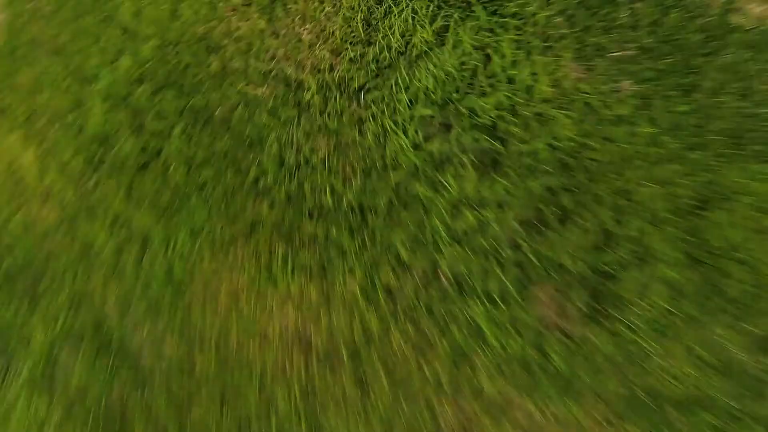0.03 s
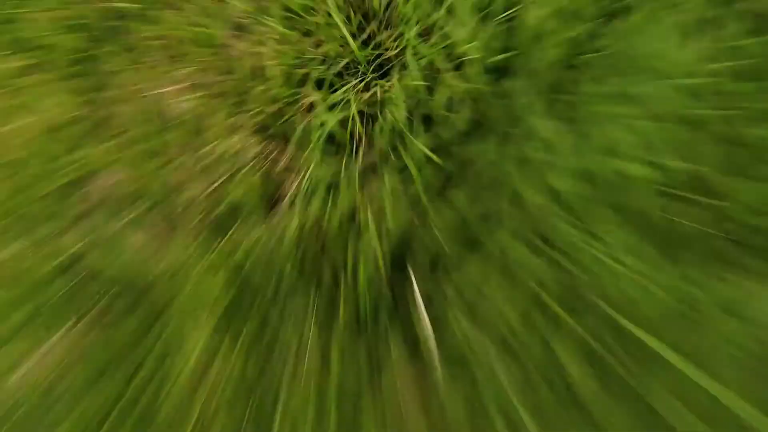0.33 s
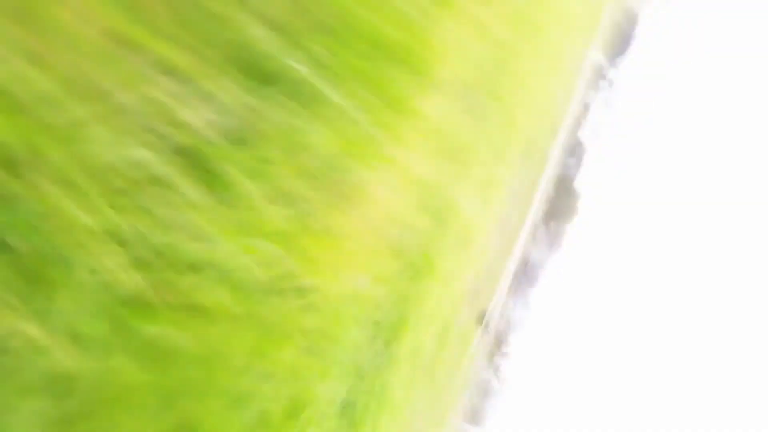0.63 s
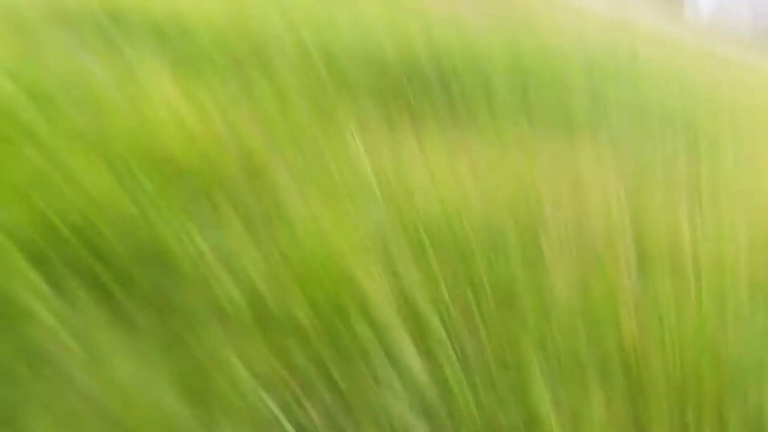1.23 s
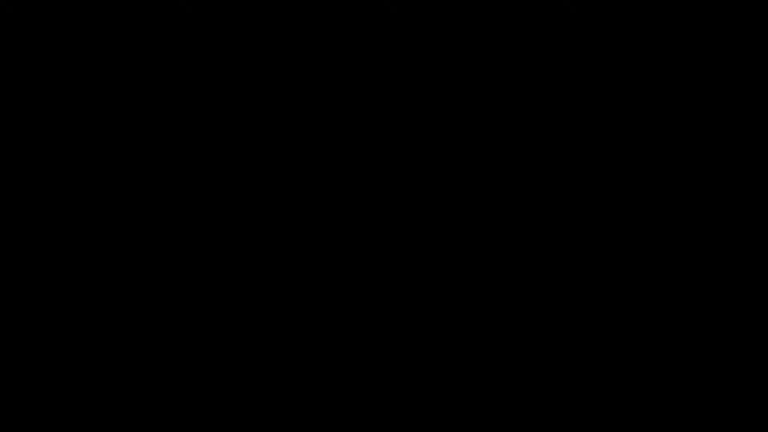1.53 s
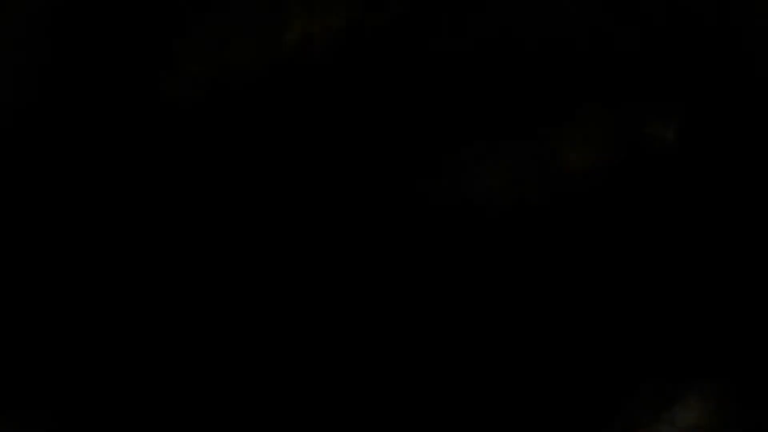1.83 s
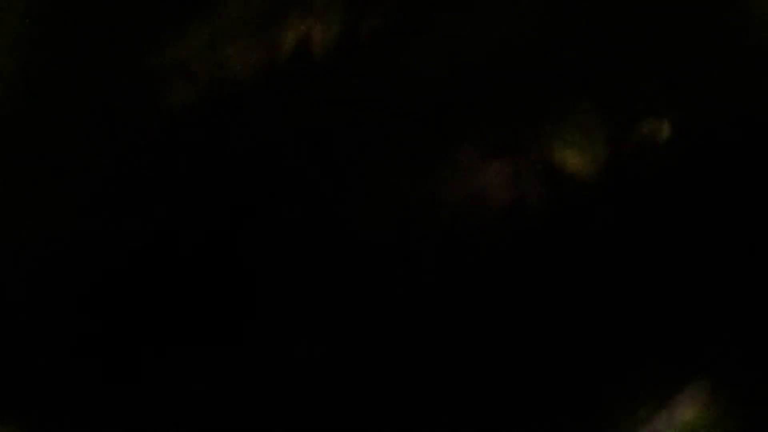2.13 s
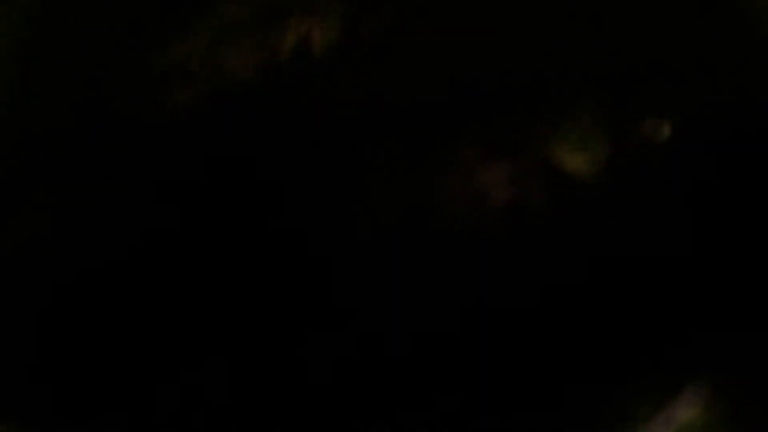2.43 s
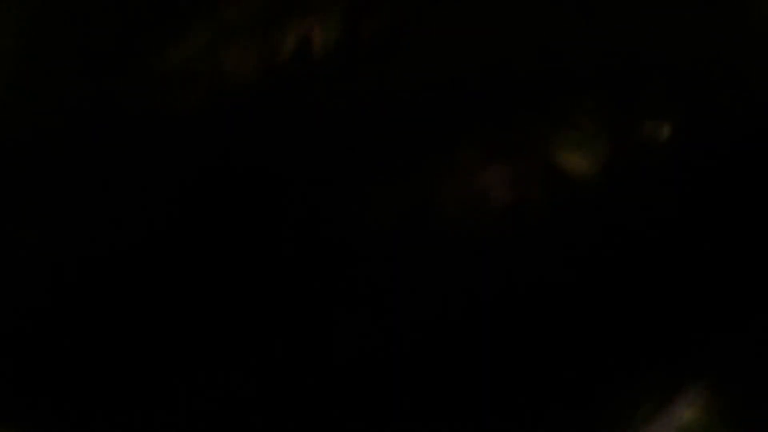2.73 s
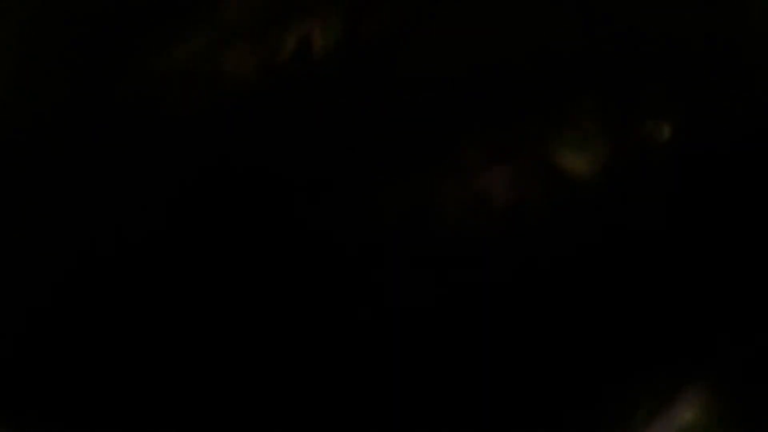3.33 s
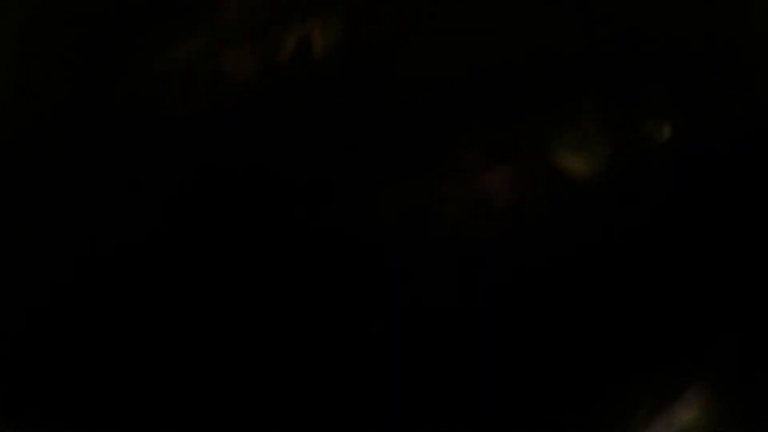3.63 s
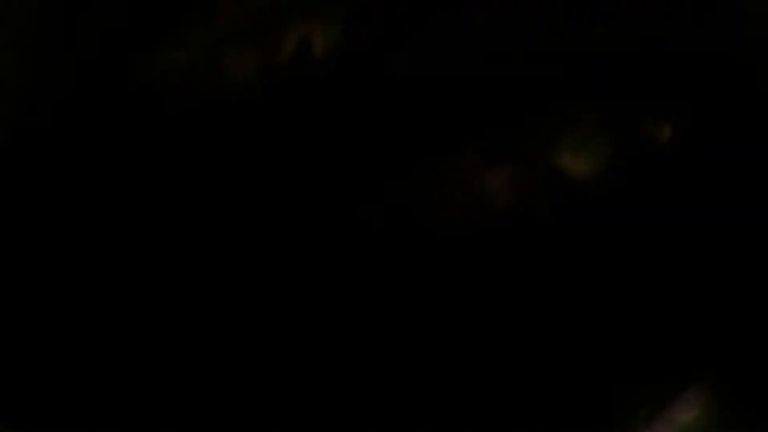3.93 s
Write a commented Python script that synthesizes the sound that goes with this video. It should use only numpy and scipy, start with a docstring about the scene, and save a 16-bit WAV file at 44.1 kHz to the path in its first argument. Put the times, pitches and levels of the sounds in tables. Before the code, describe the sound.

A small drone buzzes, then crashes into grass and tumbles with plastic knocks.

```python
"""A drone crashes in a meadow

A small four-rotor drone dives, heard by the camera on its frame. The rotors drone through the plastic
shell until it hits the ground. It cartwheels through the grass, lands hard a second time and settles.
At rest its electronics buzz faintly and the shell ticks now and then."""
import sys
import numpy as np
from scipy import signal
from scipy.fft import rfft, irfft
from scipy.io import wavfile
from scipy.ndimage import uniform_filter1d

SR = 44100
rng = np.random.default_rng(int(sys.argv[2]) if len(sys.argv) > 2 else 0)


def unload_wav(signal):
    """Save mono or channel-first audio to the path in sys.argv[1] as 16-bit WAV at rate SR, clipped to [-1, 1]."""
    wavfile.write(
        sys.argv[1],
        SR,
        np.round(np.clip(np.atleast_2d(signal).T, -1, 1) * 32767).astype(np.int16),
    )


N = 176400
T = np.arange(N) / SR
BUZZ_HZ = 50
GRIT = 0.42  # strength of the noise in a hit, next to its click
HIT_SPAN_S = 0.022  # a hit's level counts as if its energy were spread over this time

# The body's three sounds: soft thud, plastic ring, sharp crack (frequency [Hz], relative level [dB])
THUD_TONE = [(120, -15), (210, -8), (290, 1.5), (385, 1), (520, -5), (660, -5), (850, -6), (1200, -27),
             (2500, -55), (6000, -86.5)]
SHELL_TONE = [(300, -20), (900, -7.5), (1180, -2.5), (1400, 4), (1600, 3.5), (1800, -0.5), (2100, -4.5),
              (2500, -17.5), (4000, -42), (9000, -77.5)]
CRACK_TONE = [(800, -27.5), (2300, -3.5), (2900, 6), (3700, 3.5), (5200, -5.5), (7000, -10.5), (10000, -15),
              (15000, -27)]


def amp(db):
    """Turn decibels into a gain."""
    return 10 ** (np.asarray(db) / 20)


def unit(x):
    """Scale a sound to an average power of 1."""
    return x / np.sqrt(np.mean(x ** 2) + 1e-30)


def curve(rows):
    """A gain that follows (time [s], level [dB]) points."""
    return amp(np.interp(T, *np.array(rows).T))


def colour(x, points):
    """Filter through (frequency [Hz], level [dB]) points, ringing only after each push."""
    hz, db = np.array(points).T
    n = len(x)
    f = np.maximum(np.arange(n // 2 + 1) * SR / n, 1)
    gain = amp(np.interp(np.log(f), np.log(hz), db))
    cepstrum = irfft(np.log(gain), n)
    cepstrum[1:n // 2] *= 2
    cepstrum[n // 2 + 1:] = 0
    return irfft(rfft(x) * np.exp(rfft(cepstrum)), n)


def noise(points):
    """Noise with the given tone and a power of 1."""
    return unit(colour(rng.standard_normal(N), points))


def wander(per_s, t=T):
    """Glide between random values near -1 to 1, per_s times a second."""
    return np.interp(t * per_s, np.arange(1024), rng.standard_normal(1024))


def phase(hz):
    """The running angle of a tone whose pitch changes."""
    return 2 * np.pi * np.cumsum(hz) / SR


def buzz_pulses(at_s, half_length_s):
    """One smooth pulse in every cycle of the buzz."""
    cycles_away = ((T - at_s) * BUZZ_HZ + .5) % 1 - .5
    return np.exp(-(cycles_away / BUZZ_HZ / half_length_s) ** 2)


def hiss():
    """A faint, steady hiss and rumble."""
    # tone of the noise (frequency [Hz], relative level [dB])
    hiss_tone = [(15, -23.5), (35, -12), (60, 0), (105, -3), (150, -15), (400, -19), (800, -21.5),
                 (1700, -25), (2450, -29), (3100, -24.5), (5500, -38), (15000, -46)]
    return amp(-58.5) * noise(hiss_tone)


def buzz():
    """The electronics hum and tick in the shell twice a cycle, much alike each time."""
    # ticks of the buzz (time into the cycle [s], level [dB])
    cycle_ticks = [(0.017, -68.5), (.0035, -78)]
    # tones of the hum (frequency [Hz], level [dB])
    hum_tones = [(50, -60.5), (100, -59), (300, -75), (600, -76.5), (650, -78)]
    pulses = sum(amp(db) * unit(buzz_pulses(at, half_length_s=0.00094)) for at, db in cycle_ticks)
    repeating = np.resize(rng.standard_normal(SR // BUZZ_HZ), N)
    push = repeating + amp(0.5) * rng.standard_normal(N)
    ring = unit(colour(push, SHELL_TONE)) + unit(colour(push, THUD_TONE))
    hum = sum(np.sqrt(2) * amp(db + 1.5 * wander(10)) * np.sin(2 * np.pi * (hz * T + rng.random()))
              for hz, db in hum_tones)
    return pulses * amp(1.5 * wander(27)) * ring + hum


def chirps():
    """The shell chirps on every cycle of the buzz, each time at its own pitch and strength."""
    pitch_hz = 1700 * (1 + .14 * wander(200))
    pulses = buzz_pulses(at_s=.0165, half_length_s=0.0024)
    return amp(-68.5) * unit(np.sin(phase(pitch_hz)) * pulses * amp(3 * wander(50)))


def ticks():
    """Small slips in the frame make the plastic ring briefly."""
    # slips (time [s], level [dB], fade time [s])
    slips = [(0.933, -43, 0.00098), (1.2507, -30.5, 0.0017), (2.325, -59, 0.0012), (2.674, -53.5, 0.00089),
             (3.185, -47, 0.00048), (3.401, -48, 0.0049)]
    # the plastic's own notes (frequency [Hz], relative level [dB], fade time [s])
    notes = [(983, -1, 0.001), (1588, 4, 0.0015), (1740, 0.5, 0.00089), (2744, 2.5, 0.001),
             (3053, 1.5, 0.001), (4330, -7.5, 0.00021), (6880, -14.5, .0003), (9290, -16.5, 0.00011)]
    out, t = np.zeros(N), T[:2048]
    for start, db, decay in slips:
        push = GRIT * rng.standard_normal(len(t)) * np.exp(-t / decay)
        push[0] += 1  # the opening click
        ring = 0
        for hz, note_db, fade in notes:
            note = np.sin(2 * np.pi * hz * t) * t * np.exp(-t / fade)
            ring += amp(note_db) * unit(signal.fftconvolve(push, note)[:len(t)])
        i = int(start * SR)
        out[i:i + len(t)] += amp(db) * unit(ring) * np.sqrt(HIT_SPAN_S * SR / len(t))
    return out


def wind():
    """Air buffets the microphone with a low rumble."""
    # strength of the rumble (time [s], level [dB])
    loudness = [(.55, -18.5), (.6, -28.5), (1.25, -29), (1.38, -38), (1.5, -21), (1.6, -31), (1.78, -27),
                (2.1, -44), (2.35, -61.5)]
    # its tone (frequency [Hz], relative level [dB])
    wind_tone = [(10, -12), (20, 13.5), (40, -3.5), (85, -5), (130, -16.5), (200, -38.5), (400, -44),
                 (1500, -85.5)]
    return curve(loudness) * noise(wind_tone)


def groan():
    """The frame sticks and slips unevenly along the turf, ringing its low notes."""
    # strength of the groan (time [s], level [dB])
    loudness = [(1.04, -110), (1.09, -33), (1.24, -44), (1.29, -42), (1.41, -34), (1.47, -110)]
    # the frame's own notes (frequency [Hz], relative level [dB], fade time [s])
    notes = [(300, 0.5, .011), (389.3, -0.5, 0.016), (578, -9, .02)]
    slips_per_s = 75 * np.exp(.25 * wander(90))
    slip_count = np.floor(np.cumsum(slips_per_s) / SR)
    slips = np.diff(slip_count, prepend=0) * amp(6.4 * wander(60))
    ring, t = 0, T[:4096]
    for hz, db, fade in notes:
        note = np.sin(2 * np.pi * hz * t) * np.exp(-t / fade)
        ring += amp(db) * unit(signal.fftconvolve(slips, note)[:N])
    return curve(loudness) * unit(ring)


def grass():
    """Stalks flick against the tumbling shell: a rustle that swells into scrapes."""
    # strength of the rustle (time [s], relative level [dB])
    loudness = [(.6, -55), (.7, -34), (.8, -43.5), (.93, -47.5), (1.15, -36), (1.25, -39.5), (1.56, -30.5),
                (1.66, -44.5), (1.85, -44.5), (2.0, -53.5), (2.2, -82.5)]
    # scrapes (middle [s], half length [s], thud [dB], shell [dB], crack [dB])
    scrapes = [(0.572, 0.0084, -17, -16, -20.5), (0.653, 0.021, -38, -38.5, -48.5),
               (0.987, .012, -27, -30.5, -68.5), (1.455, .016, -16.5, -26.5, -50),
               (1.48, 0.012, -19, -16.5, -39.5), (1.537, 0.02, -22.5, -23.5, -34),
               (1.593, 0.039, -56, -43.5, -54), (1.783, 0.048, -42.5, -43, -52),
               (1.91, 0.072, -70, -50.5, -59.5), (2.654, 0.012, -52, -56.5, -72.5)]
    stalks_per_s = 4000
    stalks = (rng.random(N) < stalks_per_s / SR) * rng.standard_normal(N)
    stalks *= amp(-5.5 * np.minimum(rng.exponential(size=N), 3))  # some flicks are softer
    rustle = curve(loudness) * amp(4.5 * wander(110))
    out = 0
    for k, (tone, db) in enumerate([(THUD_TONE, -3), (SHELL_TONE, -6), (CRACK_TONE, -33.5)]):
        power = (rustle * amp(db)) ** 2
        for middle, half, *levels in scrapes:
            power += amp(levels[k]) ** 2 * np.exp(-((T - middle) / half) ** 2)
        out += np.sqrt(power) * unit(colour(stalks, tone))
    return out


def bounces():
    """The frame rocks on the springy turf with deep thumps."""
    # thumps (time [s], pitch [Hz], level [dB], fade time [s])
    thumps = [(0.567, 147, -7, 0.012), (0.628, 47, -10, 0.033), (1.177, 82, -16.5, 0.019),
              (1.457, 49.5, -7.5, 0.048), (1.496, 92.5, 0.5, 0.016), (1.561, 22.7, -13, 0.075),
              (1.794, 85.5, -22.5, 0.013)]
    out = 0
    for start, hz, db, decay in thumps:
        age = np.maximum(T - start, 0)
        envelope = np.exp(-age / decay) * (1 - np.exp(-age / 0.00061))
        out += amp(db) * np.sin(2 * np.pi * hz * age) * envelope
    return out


def blows():
    """Each hit is a click and a gritty crush that ring the body; where it lands sets the knock's pitch."""
    # hits, with relative levels (time [s], thud [dB], shell [dB], crack [dB], fade time [s], knock [Hz])
    hits = [(0.5648, -28, -1, -10.5, 0.00094, 375), (.568, -22, -4.5, -15, 0.0013, 373),
            (.5765, -16, -17.5, -16.5, 0.0063, 339), (0.5857, -25.5, -14.5, -34.5, 0.0011, 375),
            (0.6161, -35, -22, -29.5, 0.0015, 375), (.632, -30, -26, -49, 0.0019, 480),
            (0.64, -18.5, -32, -66, 0.0016, 348), (0.667, -29.5, -32, -51, 0.0055, 670),
            (0.693, -30.5, -33.5, -70, 0.0024, 420), (.703, -22.5, -54, -75, 0.0051, 299),
            (.773, -43.5, -39.5, -66, 0.0015, 425), (.831, -33, -36.5, -84, 0.0022, 425),
            (.871, -25, -33, -76, 0.0025, 314), (1.0745, -18, -35.5, -69, 0.0047, 391),
            (1.187, -32, -29.5, -50.5, 0.0061, 290), (1.413, -19, -32, -67, 0.005, 404),
            (1.431, -30, -17.5, -67, 0.0037, 337), (1.439, -18, -29, -56, .003, 632),
            (1.452, -12.5, -25, -54.5, 0.0038, 272), (1.466, -21, -21, -45.5, 0.0039, 632),
            (1.4775, -29, -10, -36, 0.0027, 502), (1.497, -13, -37, -52, 0.005, 433),
            (1.521, -23, -19, -35, 0.0037, 377), (1.54, -21.5, -23, -31.5, 0.0034, 478),
            (1.763, -28, -48, -60, 0.008, 385), (1.804, -31, -31, -44.5, 0.004, 375)]
    out, t = np.zeros(N), T[:4096]
    click = 1. * (t == 0)
    for start, thud_db, shell_db, crack_db, decay, knock_hz in hits:
        crush = GRIT * rng.standard_normal(len(t)) * np.exp(-t / decay)
        hollow_knock = np.sin(2 * np.pi * knock_hz * t) * np.exp(-t / 0.0053) * (1 - np.exp(-t / decay))
        thud = unit(unit(colour(crush + click, THUD_TONE)) + amp(4) * unit(hollow_knock))
        shell = unit(colour(crush + click, SHELL_TONE))
        crack = unit(colour(crush + .4 * click, CRACK_TONE))
        ring = amp(thud_db) * thud + amp(shell_db) * shell + amp(crack_db) * crack
        i = int(start * SR)
        out[i:i + len(t)] += ring * np.sqrt(HIT_SPAN_S * SR / len(t))
    return amp(-7) * out


def frame_shake():
    """The unbalanced rotors shake the frame at two low, wavering pitches."""
    # strength of the shaking (time [s], level [dB])
    loudness = [(0, -15), (.06, -21.5), (.135, -9.5), (.175, -25), (.22, -10), (.29, -26.5), (.335, -11),
                (.41, -18.5), (.44, -29), (.48, -4), (.53, -19), (.57, -40)]
    main_hz, second_hz = 89.3, 100.2
    spin = phase(1 + 0.029 * wander(16))
    return curve(loudness) * np.sqrt(2) * (np.sin(main_hz * spin) + amp(-11) * np.sin(second_hz * spin))


def motor_whine():
    """The motors give a thin, slightly unsteady whine."""
    # tones of the whine (frequency [Hz], level [dB])
    tones = [(4958, -53.5), (5012, -52.5), (5227, -56)]
    return sum(np.sqrt(2) * amp(db) * np.sin(phase(hz * (1 + .006 * wander(4.9)))) for hz, db in tones)


def rotors():
    """Four rotors at different speeds each make a stack of fluttering overtones, amid rushing air."""
    # rotors (speed [turns/s], relative level [dB], speed change [turns/s per s],
    # extra speed-up while trying to pull out of the dive [turns/s per s])
    rotor_settings = [(89.42, -0.5, -9.5, 35.5), (96.28, -4, -13, 30), (99.23, -1.5, -11, 0),
                      (100.34, -4, -22, 110)]
    # their tone through the shell (frequency [Hz], relative level [dB])
    flight_tone = [(82, -35), (140, 1.5), (242, -6.5), (294, -2.5), (331, -9.5), (372, -7.5), (435, -19.5),
                   (518, -18.5), (571, -12), (766, -11), (949, -9), (1200, -14.5), (1300, -6.5), (1490, -4),
                   (2470, -21.5), (3060, -21.5), (4530, -34.5), (5090, -23.5), (6070, -41), (9700, -42),
                   (13500, -57.5), (14900, -107)]
    # their strength (time [s], level [dB])
    loudness = [(0, -17), (.13, -17.5), (.38, -19.5), (.5, -17.5), (.56, -20)]
    blades, t = np.zeros(N), T[:N // 6]
    pulling_s = np.maximum(t - .34, 0)
    snarl_hz = 1420 * (1 + 0.064 * wander(32, t))  # the shell boosts overtones near this pitch
    for hz, db, change, pull in rotor_settings:
        speed = (hz + change * t + pull * pulling_s) * (1 + .006 * wander(14, t))
        angle = phase(speed)
        for k in range(2, 130):
            snarl_db = 5.5 * np.exp(-((k * speed - snarl_hz) / 110) ** 2)
            flutter_db = 5.5 * wander(25, t)
            gain = amp(db + snarl_db + flutter_db - 3 * (k % 2))  # odd multiples are weaker
            blades[:len(t)] += gain * np.sin(k * angle + rng.uniform(0, 2 * np.pi))
    blades = colour(blades, flight_tone)
    blades /= blades[:len(t)].std()
    air = noise([(60, -31.5)] + list(flight_tone)) * amp(-7 + 1.1 * wander(120))
    return curve(loudness) * (blades + air)


def scene():
    """Everything reaches the camera through its own body: nearly mono, a little wider in the treble."""
    # stereo width (frequency [Hz], side level [dB])
    width = [(50, -49.5), (200, -48), (700, -24.5), (2000, -22.5), (5000, -16.5), (12000, -13.5)]
    crash_s, stall_s = .582, 0.0013
    running = np.exp(-np.maximum(T - crash_s, 0) / stall_s)
    flight = running * (rotors() + frame_shake() + motor_whine())
    tumble = blows() + ticks() + grass() + groan() + wind() + bounces()
    mid = flight + tumble + buzz() + hiss() + chirps()
    scatter = rng.standard_normal(256) * np.hanning(256)
    smeared = np.convolve(mid, scatter / np.linalg.norm(scatter))[:N]
    side = colour(smeared, width)
    return np.array([mid + side, mid - side])


def record(dry):
    """The camera overloads on hard hits, briefly lets one side lag, drops out once and cuts the top."""
    ceiling, lag_s, dropout_db, top_hz = 0.89, 0.0065, -26.5, 15100
    left, right = ceiling * np.tanh(dry / ceiling)
    lagging = uniform_filter1d(1. * ((T > .348) & (T < .51)), size=64)
    right = (1 - lagging) * right + lagging * np.interp(T - lag_s, T, right)
    dropout = uniform_filter1d(amp(dropout_db * ((T > 2.072) & (T < 2.091))), size=32)
    treble_cut = signal.ellip(8, .2, 70, top_hz, fs=SR, output="sos")
    return signal.sosfilt(treble_cut, dropout * np.array([left, right]))


dry = scene()
out = record(dry)
unload_wav(out)
```